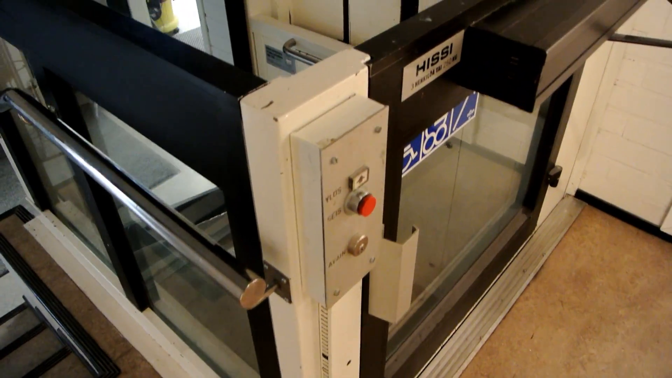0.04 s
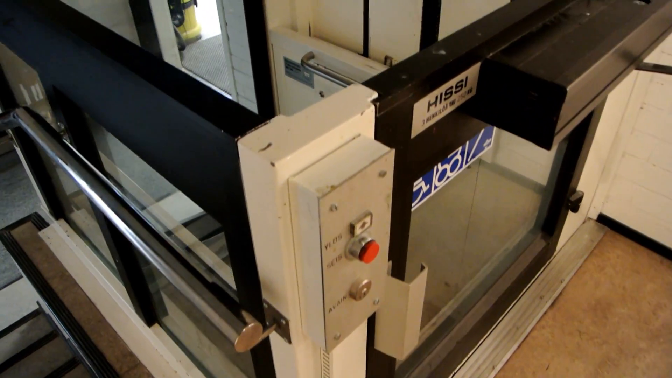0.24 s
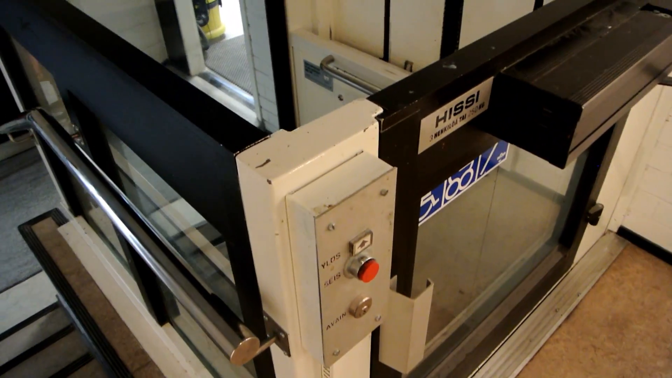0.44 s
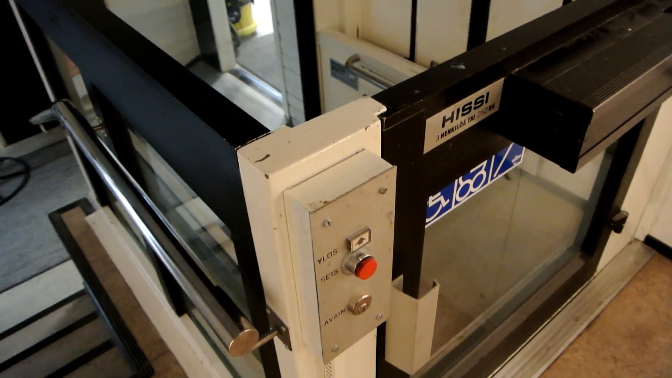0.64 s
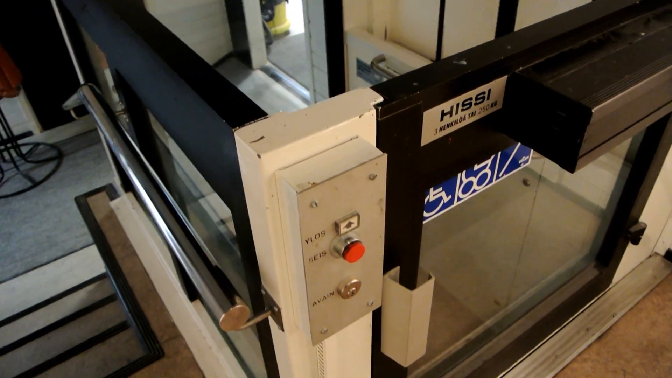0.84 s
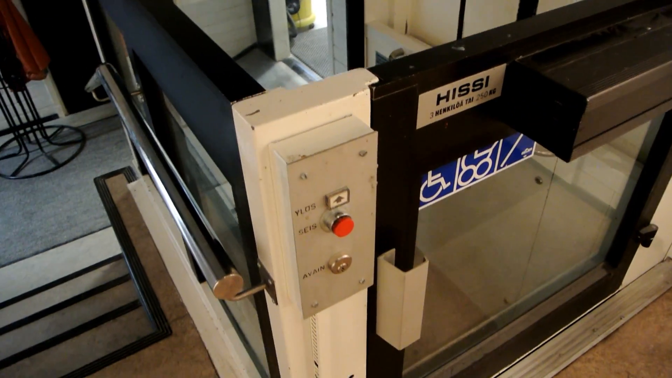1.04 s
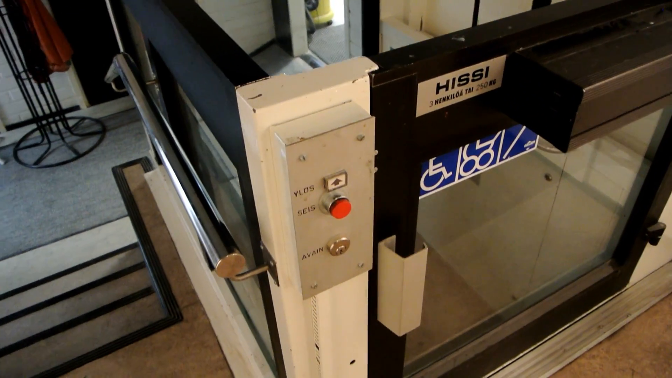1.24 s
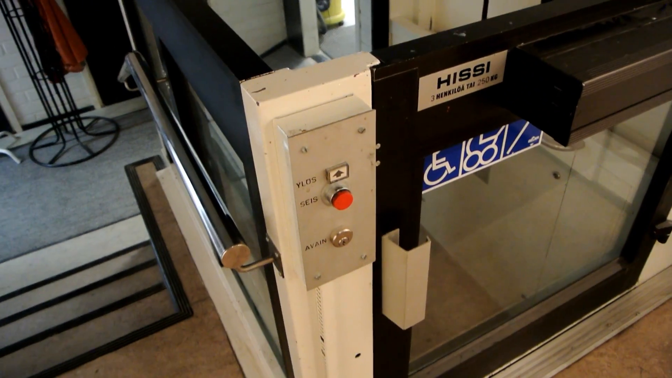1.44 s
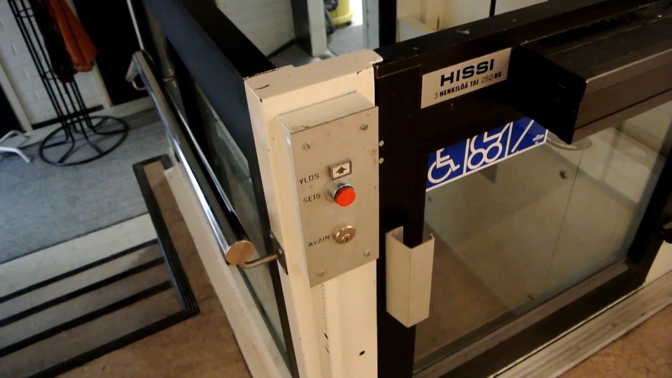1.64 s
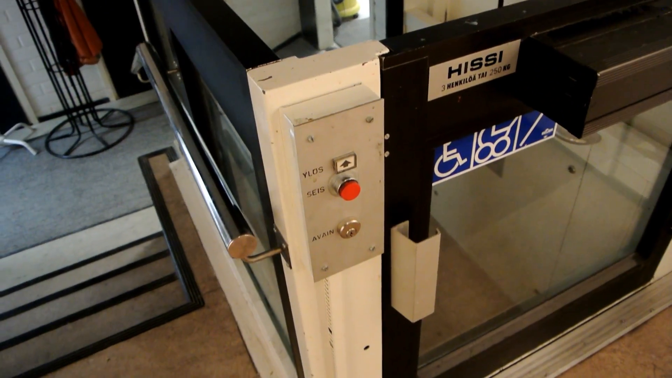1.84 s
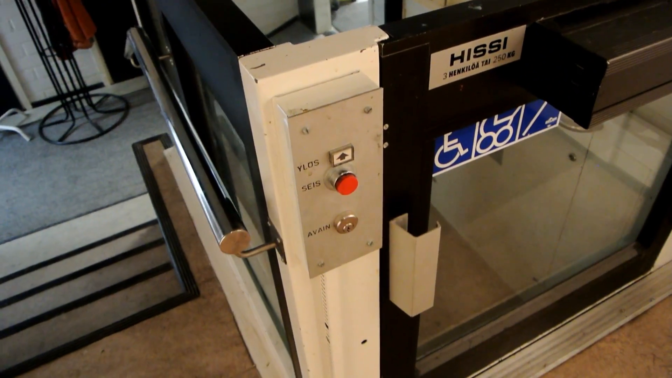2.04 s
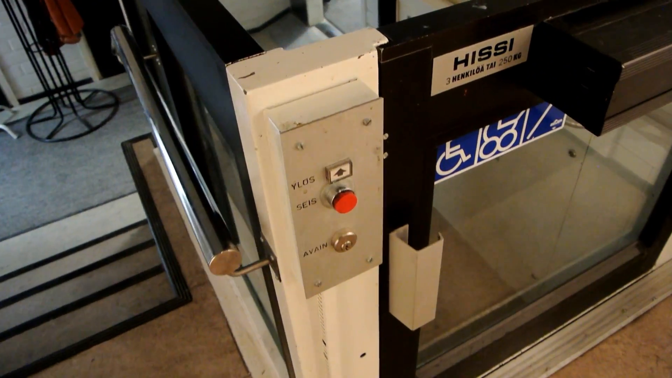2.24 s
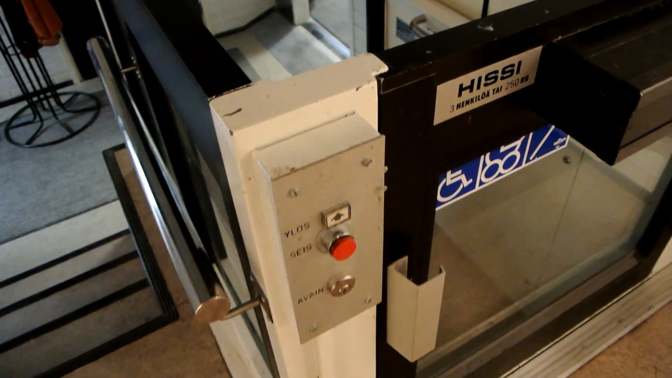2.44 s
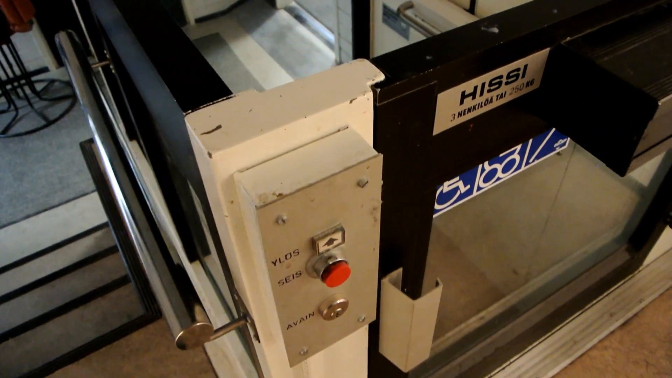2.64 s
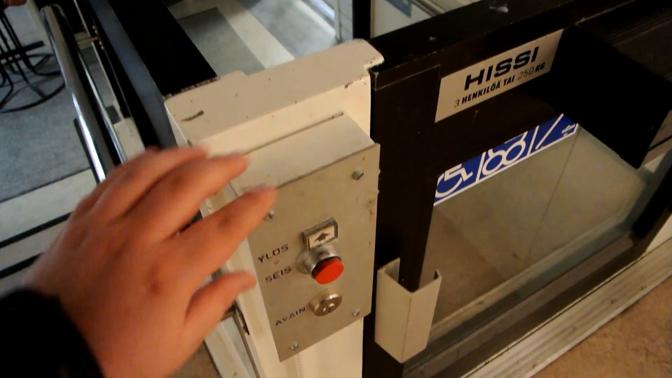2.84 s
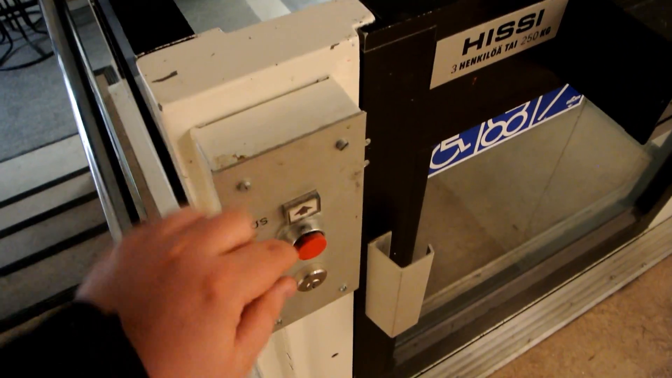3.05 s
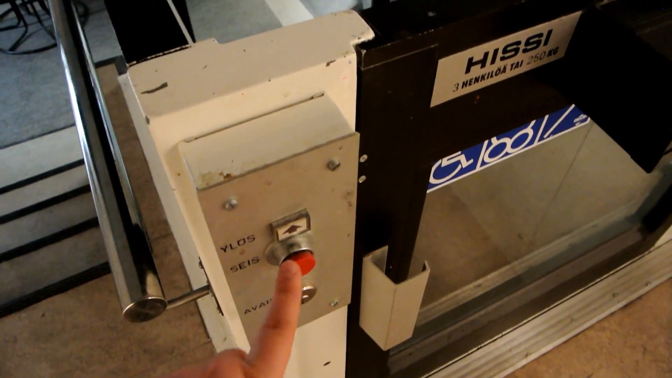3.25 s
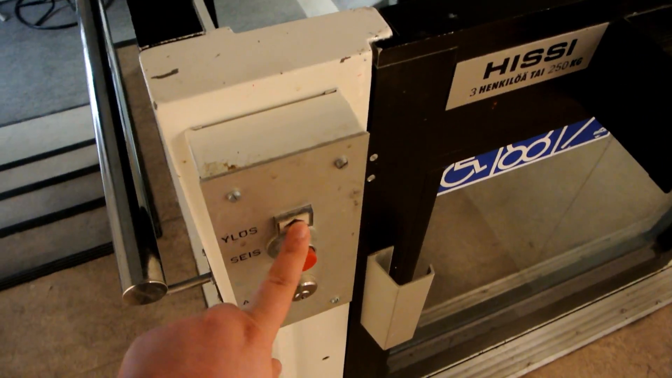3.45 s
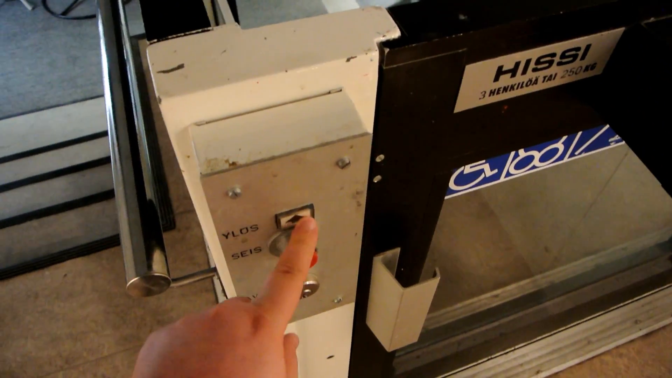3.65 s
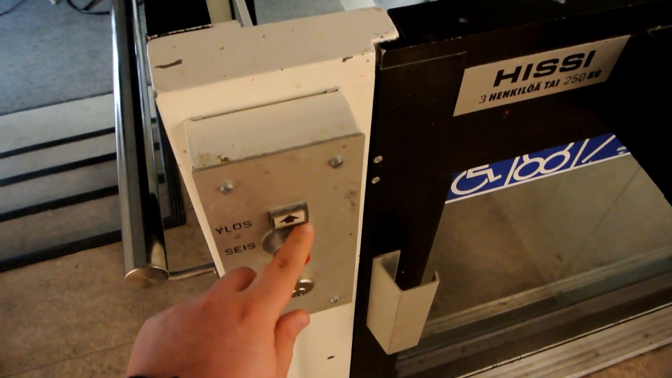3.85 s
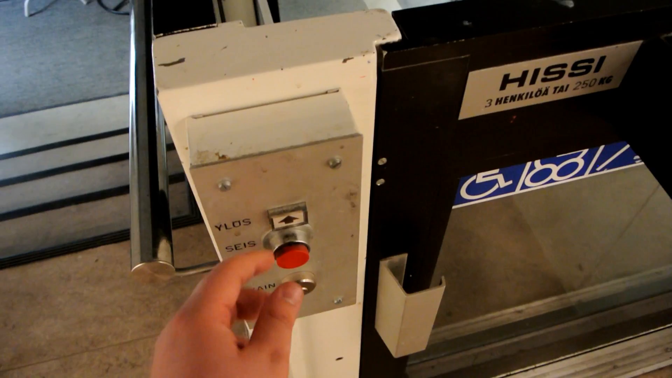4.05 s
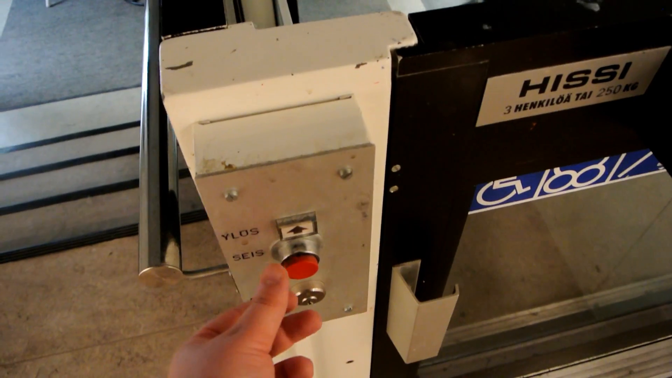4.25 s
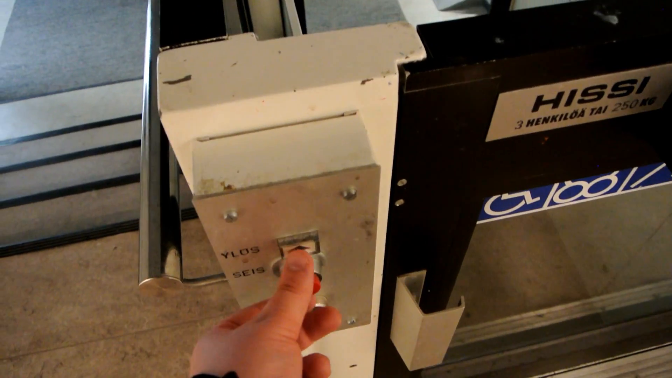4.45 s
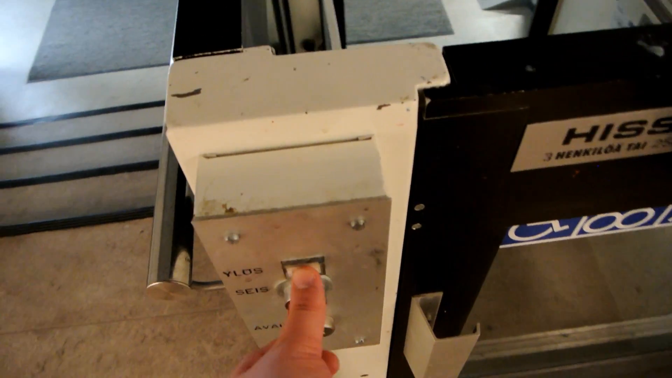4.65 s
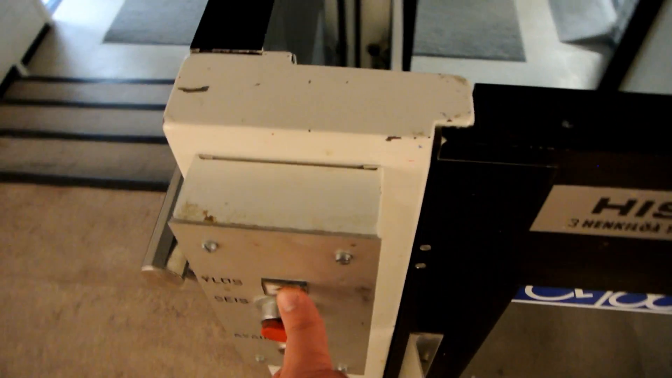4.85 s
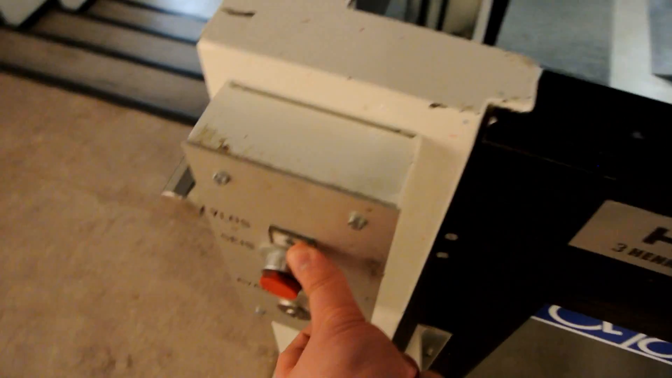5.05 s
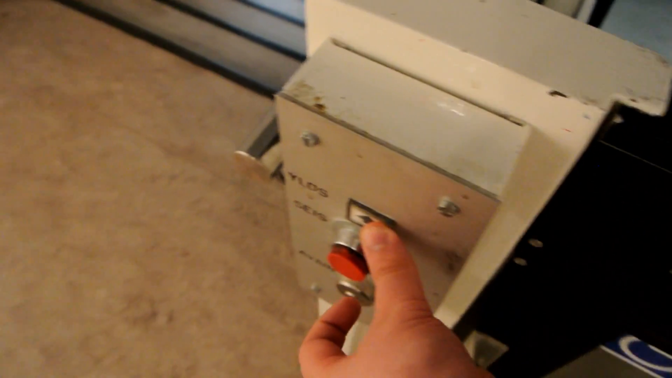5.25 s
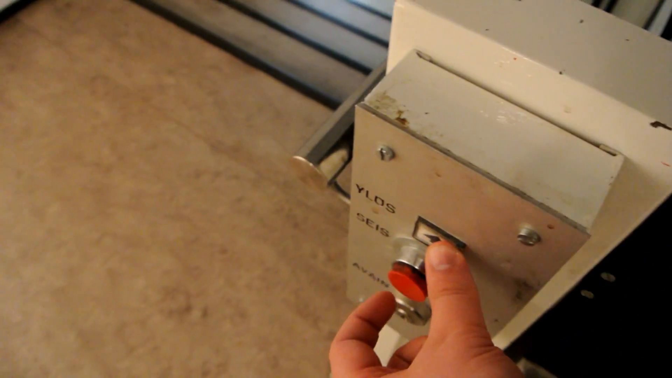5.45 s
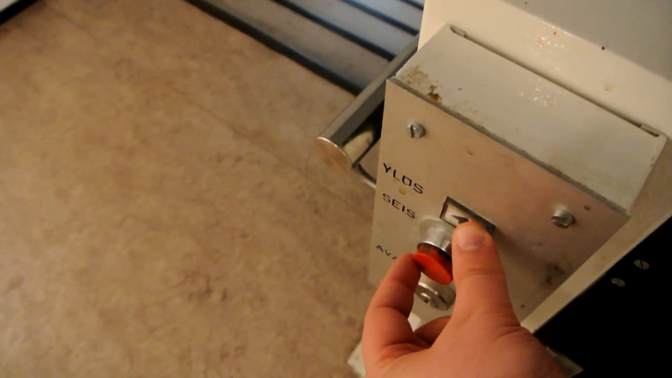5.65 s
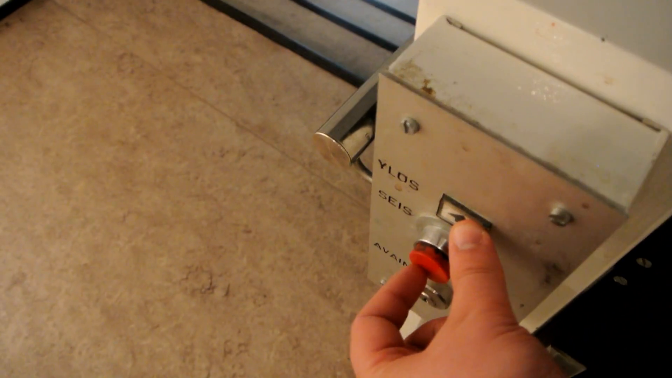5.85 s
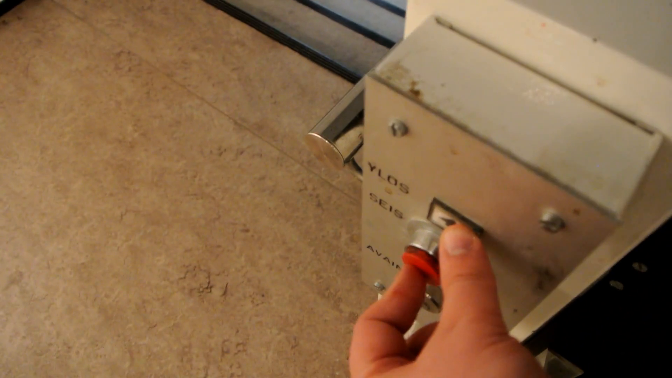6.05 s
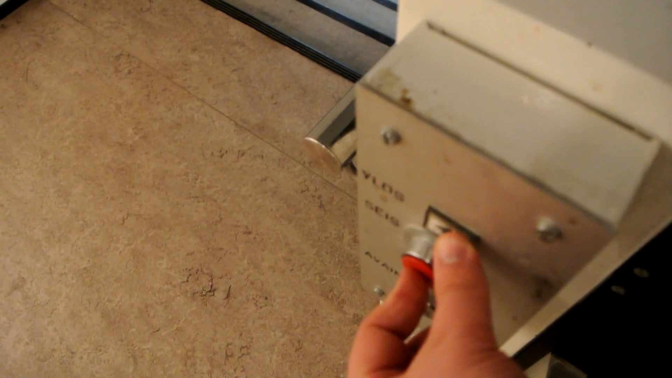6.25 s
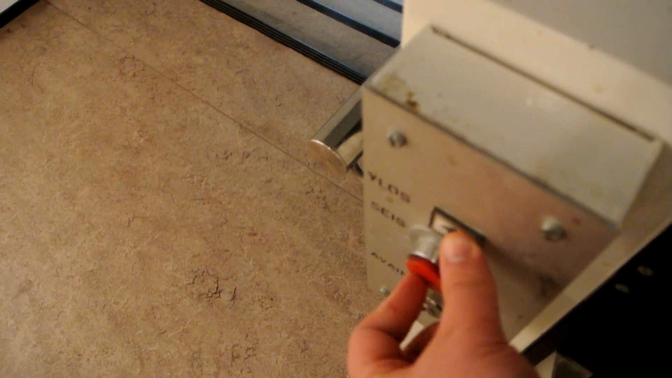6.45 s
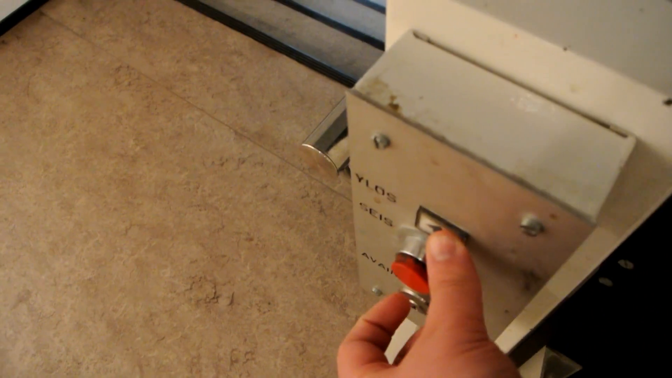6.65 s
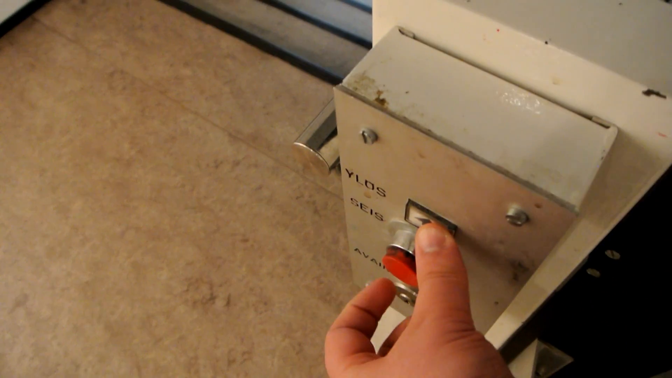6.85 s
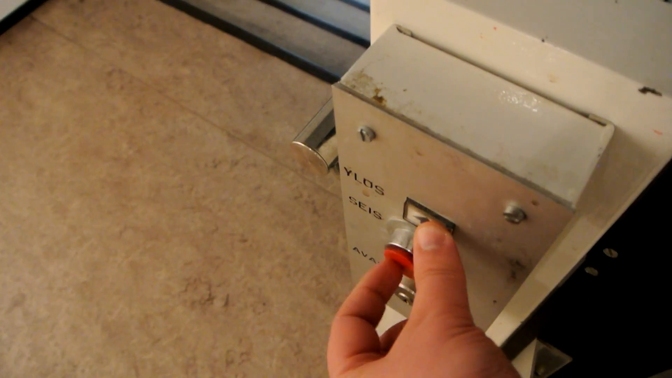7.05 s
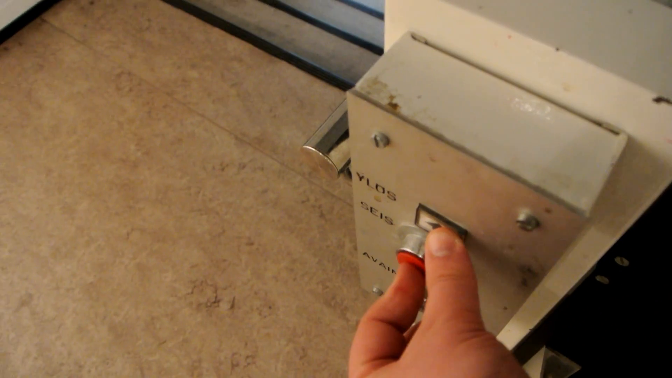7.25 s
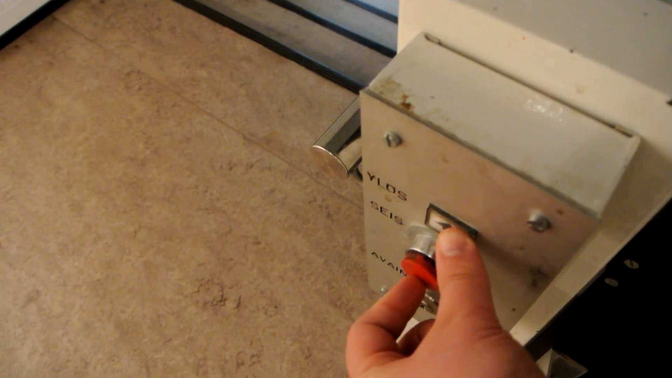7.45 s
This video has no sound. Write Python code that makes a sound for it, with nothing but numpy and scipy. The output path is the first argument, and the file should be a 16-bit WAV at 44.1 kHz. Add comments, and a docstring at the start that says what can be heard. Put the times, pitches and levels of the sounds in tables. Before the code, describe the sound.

A close stereo pickup in a quiet hallway: soft room noise, a faint wandering whine around 1.5 kHz and light sleeve rustles. At 1.2-1.5 s a gate and frame clunk with a bright, rattling knock, and a second, duller heavy clunk follows at 1.9 s. Cloth rustles more around 2.6-3.5 s as an arm reaches in; a faint tick at 3.0 and a crisp button click at 3.53. At 3.7 a relay ticks, the contactor clacks hard and a lock bolt rings; the drive hums with a hissing surge and low shudder, until brake knock and drop-out clack at 4.13. Cloth brushes and a button ticks at 4.67. The lift restarts at 4.85 and runs steadily, hiss fading, until 6.4. A tick at 6.6 leads to a third start at 6.69, another tick at 7.18, and a final brake and clack near 7.38, echoing briefly.

```python
"""Quiet room noise with a faint wandering whine and a sleeve's rustle opens a hallway, close to a small
platform lift. Gate and frame clunk; then the button clicks and the lift is jogged three times: relay,
armature and contactor clack, the lock bolt rings, the drive hums, hisses and shudders, the brake bites
and the contactor drops out. Blows are bursts of tiny contacts ringing a coloured body and a hallway echo;
the drive is wavering sines and shaped noise; cloth and room are coloured noise, the whine a sine."""
import sys
import numpy as np
from scipy import signal
from scipy.fft import rfft, irfft, next_fast_len
from scipy.io import wavfile
from scipy.ndimage import uniform_filter1d, minimum_filter1d, map_coordinates

SR = 44100
rng = np.random.default_rng(int(sys.argv[2]) if len(sys.argv) > 2 else 0)


def file_out(sig):
    """Save sig as 16-bit WAV at sys.argv[1]."""
    # one column per channel
    cols = np.atleast_2d(sig).T
    # limit, then scale
    lim = np.clip(cols, -1, 1)
    pcm = np.round(lim * 32767).astype(np.int16)
    wavfile.write(sys.argv[1], SR, pcm)


N = 331191
TIME = np.arange(N) / SR

# room noise colour: (frequency [Hz], relative level [dB per Hz])
ROOM_COLOUR = [(12, -31), (20, -6), (158, -4.5), (193, -1.5), (472, -5), (678, -5.5), (759, -7.5),
               (1440, -6), (1570, -10), (2140, -10.5), (2460, -10), (3070, -12), (11000, -15), (16000, -20)]
# centre pitch of the whine: (time [s], frequency [Hz])
WHINE_PITCH = [(0, 1461), (2.93, 1490), (3.17, 1440), (3.6, 1474)]

# strokes of the sleeve: (middle [s], length [s], level [dB])
SLEEVE_STROKES = [(0, 0.15, -45.5), (.44, 0.15, -51.5), (0.743, 0.13, -43.5), (2.63, 0.13, -43),
                  (2.86, .28, -43), (3.03, 0.18, -38.5), (3.272, 0.18, -44), (3.473, 0.15, -46),
                  (4.316, 0.15, -37.5), (4.557, 0.33, -44.5)]
# cloth colour: (frequency [Hz], relative level [dB per Hz])
CLOTH_COLOUR = [(200, -0.5), (800, 2.5), (2500, -1.5), (5000, -1), (9000, 0.5), (12500, 1), (16000, -10)]
STROKE_SQUARENESS = 3.6  # higher = more abrupt ends

# knocks on gate and frame: (time [s], level [dB], boom [dB], brightness [dB], rise [s], rattle t60 [s])
FRAME_KNOCKS = [(.40, -43, -10, -17, 0.026, 0.25), (1.11, -42.5, -2, -6, .015, 0.17),
                (1.204, -28, -6, 12.5, 0.00084, 0.7), (1.231, -24, -8, 10.5, 0.0047, 0.83),
                (1.257, -11.5, 9, 13.5, 0.003, 0.2), (1.33, -29.5, 8.5, -19, 0.0071, 1),
                (1.482, -25.5, -5, -1, 0.013, 0.16), (1.814, -24.5, 2, 18.5, 0.01, 0.17),
                (1.893, -10.5, 9.5, 7, 0.025, .21), (2.12, -38, 10.5, -10, 0.058, 0.62),
                (4.52, -36, 6, -5, 0.0061, 0.16)]
# colour of gate and frame: (frequency [Hz], relative level [dB per Hz])
FRAME_COLOUR = [(25, -24), (45, 1.5), (75, -6), (250, -3), (600, -5), (1500, -4.5), (2600, -6), (4500, -12),
                (10000, -12), (13000, -14), (16000, -24.5)]
# resonances of gate and frame: (frequency [Hz], width [Hz], height over the colour [dB])
FRAME_RESONANCES = [(105.8, 0.97, 12.5), (165.2, 4.7, 7.5), (217, 41, 1), (287, 9, 7.5), (436, 24, 2),
                    (1096, 29, 2.5)]

# button and small panel ticks: (time [s], level [dB], body [dB], brightness [dB])
BUTTON_TICKS = [(3.003, -31.5, 2, -18), (3.5294, -13.5, -8.5, -2.5), (3.630, -28, 7, -12),
                (4.671, -25.5, -7, 1), (6.119, -25, -21, 10), (6.606, -25.5, -3, -7), (7.182, -20, -12, 12)]
# button colour: (frequency [Hz], relative level [dB per Hz])
BUTTON_COLOUR = [(60, -32), (300, -15), (550, -2), (1000, -5.5), (1900, -2), (3600, -6.5), (4800, -10),
                 (9000, -23.5), (13000, -14), (16000, -34)]
# button resonances: (frequency [Hz], width [Hz], height over the colour [dB])
BUTTON_RESONANCES = [(550, 390, 3.4), (1660, 140, 1.7), (3840, 100, 1.9)]
TICK_RISE_S, TICK_T60_S = 0.00021, 0.024

# starts of the lift: (contactor closes [s], level [dB], body [dB], relay trigger [dB], armature trigger [dB],
# start-up hiss [dB], delay until the load is taken up [s], jolt of that load [dB])
LIFT_STARTS = [(3.706, -11, -3, -31, -19, -19, .142, -13.5), (4.849, -12.5, 0, -28, -19.5, -21, .176, -23),
               (6.687, -12.5, -4.5, -20.5, -22.5, -25.5, .224, -26)]
# stops of the lift: (contactor drops out [s], level [dB], body [dB], brake knock [dB], its brightness [dB])
LIFT_STOPS = [(4.128, -8.5, -9, -20, 1), (6.402, -10, -5.5, -16.5, -3), (7.377, -11.5, -2, -16.5, -9)]
# relay ticking before each start:
# (delay [s], level over its trigger [dB], body [dB], brightness [dB], rise [s], rattle t60 [s])
RELAY_TICK = [(-.037, -0.5, -6, 7.5, 0.0004, 0.066)]
# armature travelling before contact:
# (delay [s], level over its trigger [dB], body [dB], brightness [dB], rise [s], rattle t60 [s])
ARMATURE_TRAVEL = [(-0.025, 2, -2, 1, 0.0057, 0.12)]
# colour of contactor and lock: (frequency [Hz], relative level [dB per Hz])
CONTACTOR_COLOUR = [(30, -35), (170, -3), (400, -8), (900, -4.5), (1500, -4), (2700, -1.5), (4200, 0),
                    (6500, -7.5), (10000, -7.5), (13000, -12), (16000, -24.5)]
# contactor resonances: (frequency [Hz], width [Hz], height over the colour [dB])
CONTACTOR_RESONANCES = [(640, 120, 13.2), (850, 85, 9.1), (1034, 40, 13.6), (1130, 55, 16.5),
                        (2444, 84, 6.4), (2762, 165, 6.8), (3780, 98, 5.3), (7550, 100, 7.4)]
CLOSE_BRIGHT_DB, CLOSE_RISE_S, CLOSE_T60_S = 6, 0.00084, 0.13
DROP_BRIGHT_DB, DROP_RISE_S, DROP_T60_S = 3.5, 0.0028, 0.089

# the motor's first torque thumping the frame:
# (delay [s], level over the start [dB], boom [dB], brightness [dB], rise [s], rattle t60 [s])
TORQUE_KICK = [(.002, -13.5, 7.5, -3, 0.0043, 0.2)]
# the jolt as the drive takes up the load
TAKE_UP_BOOM_DB, TAKE_UP_BRIGHT_DB, TAKE_UP_RISE_S, TAKE_UP_T60_S = 7.5, 7.5, 0.011, .15
BRAKE_LEAD_S = .143  # the brake bites this long before the drop-out
BRAKE_BOOM_DB, BRAKE_KNOCK_RISE_S, BRAKE_T60_S = 2.5, 0.015, 0.1

# motor and gear tones: (frequency [Hz], level before the overall hum gain [dB])
HUM_TONES = [(96.9, -38), (193.8, -42.5), (301.5, -37), (517.5, -38), (602.9, -43), (737.5, -46),
             (1104, -40), (2509, -52), (2778, -46.5)]
# colour of the platform's rumble: (frequency [Hz], relative level [dB per Hz])
RUMBLE_COLOUR = [(30, -37), (110, -11), (170, 3), (250, -5), (330, 1), (440, 1), (520, -8.5), (800, -5.5),
                 (1150, -2.5), (1600, -8.5), (2200, -19.5), (4000, -19), (9000, -70)]
# colour of the platform's hiss: (frequency [Hz], relative level [dB per Hz])
HISS_COLOUR = [(500, -24), (1500, 6.5), (2700, -3.5), (4000, -1.5), (5200, -1), (7500, -1), (10000, 2),
               (12500, -6), (16000, -35)]
# hiss resonances: (frequency [Hz], width [Hz], height over the colour [dB])
HISS_RESONANCES = [(1940, 140, 5.5), (2560, 250, 10.5), (2740, 70, 6), (6070, 410, -0.5)]
# colour of the low shudder: (frequency [Hz], relative level [dB per Hz])
SHUDDER_COLOUR = [(15, -32), (30, -13), (46, 0), (58, -9.5), (72, -12.5), (160, -29)]
SLOWING_S = 0.079  # the drive slows this long before the drop-out
HUM_DB, SPIN_UP_S, SPIN_DOWN_DB_PER_S = -3.5, 0.24, 115
RUMBLE_DB, RUMBLE_RISE_S, COAST_DB_PER_S = -30.5, 0.18, 46.5
# the hiss falls as a power of the time since the start
HISS_SETTLE_S, HISS_FALL, HISS_STOP_DB_PER_S = 0.059, 0.72, 151
BRAKE_HISS_DB, BRAKE_RISE_S, BRAKE_DB_PER_S = -37.5, 0.063, 92
SHUDDER_DB, JOLT_DB, BRAKE_JOLT_DB = -48.5, -33.5, -41  # steady, added at the start, at braking
SURGE_RISE_S, JOLT_DB_PER_S, SHUDDER_STOP_DB_PER_S = 0.034, 40, 60

# the lock bolt following each start:
# (delay [s], level over the start [dB], body [dB], brightness [dB], rise [s], rattle t60 [s])
BOLT_SHOT = [(.042, -3, -5.5, 3, .002, 0.13)]
# bolt resonances: (frequency [Hz], width [Hz], height over the colour [dB])
BOLT_RESONANCES = [(1922, 140, 15), (2385, 48, 10.4), (2710, 140, 13), (3410, 59, 5.8)]

# likeness of left and right in diffuse sound: (frequency [Hz], correlation)
STEREO_LIKENESS = [(100, 0.8), (300, .94), (600, 0.63), (1200, 0.66), (2500, 0.095), (6000, 0.011)]
# decay of the hallway, before the echo length scales it: (frequency [Hz], t60 [s])
HALL_DECAY = [(100, 1), (260, 0.81), (700, 1), (1840, 0.83), (4850, 0.32), (12800, 0.21)]
# where the lift lies from the listening point: (time [s], left-right difference [dB], left lag [ms])
LIFT_POSITION = [(1.9, 2, -0.017), (3.6, 0, 0.011), (4.2, 1.5, 0.043), (4.9, -0.5, 0.065),
                 (5.6, -4, -0.012), (6.7, -3, 0.11), (7.4, -5, 0.14)]
# the two microphones differ: (frequency [Hz], left-right difference [dB])
MICROPHONE_BALANCE = [(400, 0), (750, -1.5), (8000, -1.5), (15000, 3.5)]
TOP_HZ = 15900
SIDES = np.array([[.5], [-.5]])  # shares a left-right difference between the two channels


def amp(db):
    """Decibels to gain."""
    return 10 ** (np.asarray(db) / 20)


def unit(x):
    """x at rms 1."""
    return x / np.sqrt(np.mean(np.abs(x) ** 2) + 1e-20)


def along(points, hz):
    """(frequency [Hz], value) points read on a log axis."""
    f, v = np.transpose(points)
    return np.interp(np.log(hz + 1), np.log(f + 1), v)


def curves(rows, when=TIME):
    """Each column after the time, read at the given moments."""
    s, *cols = np.transpose(rows)
    return [np.interp(when, s, c) for c in cols]


def wobble(rate):
    """A smooth random curve, rate knots a second."""
    knots = rng.standard_normal(int(N * rate / SR) + 4)
    return map_coordinates(knots, [TIME * rate])


def envelope(start, rise_s, release, fall_db_per_s):
    """A straight rise, a hold until the release, then a steady fall in dB."""
    rise = np.clip((TIME - start) / rise_s, 0, 1)
    return rise * amp(-fall_db_per_s * np.maximum(TIME - release, 0))


def colour(spectrum, modes, hz):
    """Gain of a smooth spectrum with resonances standing on it."""
    peaks = sum(amp(2 * db) / (1 + (2 * (hz - centre) / width) ** 2) for centre, width, db in modes)
    return amp(along(spectrum, hz)) * np.sqrt(1 + peaks)


def causal(gain):
    """The minimum-phase response with this gain: it rings only after the blow."""
    cepstrum = irfft(np.log(np.maximum(gain, 1e-6)))
    half = len(cepstrum) // 2
    return np.exp(rfft(np.r_[cepstrum[0], 2 * cepstrum[1:half], np.zeros(half)]))


def diffuse(spectrum, modes=(), size=N):
    """Coloured stereo noise of rms 1, alike in the bass and unrelated in the treble."""
    m = 2 * next_fast_len(size // 2 + 1)
    hz = np.fft.rfftfreq(m, 1 / SR)
    turn = np.arccos(np.clip(along(STEREO_LIKENESS, hz), -1, 1)) / 2
    noise = rfft(rng.standard_normal((2, m))) * colour(spectrum, modes, hz)
    mid, side = irfft(noise * [np.cos(turn), np.sin(turn)])[:, :size]
    return unit(np.array([mid + side, mid - side]))


def hall_tail(length):
    """A fresh echo, energy 1 on the left; each frequency dies at its own speed."""
    hz, t, z = signal.stft(diffuse([(1, 0)], size=SR), SR, nperseg=256)
    t60 = length * along(HALL_DECAY, hz)[:, None]
    tail = signal.istft(z * amp(-60 * t / t60), SR, nperseg=256)[1]
    tail = tail * (1 - np.exp(-np.arange(tail.shape[1]) / SR / 0.00073))  # soft onset
    return tail / np.linalg.norm(tail[0])


def blows(events, spectrum, modes, body_hz, bright_hz, spiky, wet_db, echo_length=1, size=65536):
    """Each blow is a dying chatter of tiny contacts that rings the struck body and then the hallway."""
    out = np.zeros((2, N + size))
    t, hz = np.arange(size) / SR, np.fft.rfftfreq(size, 1 / SR)
    body = colour(spectrum, modes, hz)
    low = np.exp(-np.log2((hz + 1) / body_hz) ** 2)  # body level acts on the octaves around the boom
    high = hz ** 2 / (hz ** 2 + bright_hz ** 2)  # brightness acts on the treble
    for s, db, body_db, bright_db, rise, t60 in events:
        spikes = np.exp(spiky * rng.standard_normal(size // 16).repeat(16))
        contacts = unit(rng.standard_normal(size) * spikes)
        # the last factor makes up for level lost in a slow rise
        force = contacts * (1 - np.exp(-t / rise)) * amp(-60 * t / t60) * (1 + 2 * rise / t60)
        sound = rfft(force) * causal(unit(body * amp(body_db * low + bright_db * high)))

        pan_db, lag_ms = curves(LIFT_POSITION, s)
        direct = np.exp(-2j * np.pi * hz * SIDES * lag_ms / 1000)
        panels = amp(-2.0) * rfft(hall_tail(0.15), size)  # quick echoes between the lift's glass and steel
        hallway = amp(wet_db) * rfft(hall_tail(echo_length), size)
        pan = amp(SIDES * pan_db * hz / (hz + 700))  # the treble leans to one side more than the bass
        paths = pan * (direct * (1 + panels) + hallway)
        out[:, round(s * SR):][:, :size] += amp(db) * irfft(sound * paths)
    return out[:, :N]


def set_off(parts, triggers):
    """The same sequence of blows for each (time [s], level [dB]) trigger."""
    return [(s + delay, db + part_db, *shape) for s, db in triggers for delay, part_db, *shape in parts]


def starts():
    """(time [s], level [dB]) of each closing of the contactor."""
    return [(s, db) for s, db, *_ in LIFT_STARTS]


def room():
    """Steady room noise, its level gently wavering, with a thin sine whine of wandering pitch."""
    pitch = curves(WHINE_PITCH)[0] + 24 * wobble(110)
    whine = amp(-57.0 + 0.77 * wobble(12)) * np.sin(2 * np.pi * np.cumsum(pitch) / SR)
    noise_gain = amp(-46.0 + 1.65 * wobble(4.05) + 0.33 * wobble(25))
    return noise_gain * diffuse(ROOM_COLOUR) + whine


def sleeve():
    """Cloth slides in short strokes of noise as the arm moves and reaches for the panel."""
    power = sum(amp(db) ** 2 * np.exp(-np.abs(2 * (TIME - s) / length) ** STROKE_SQUARENESS)
                for s, length, db in SLEEVE_STROKES)
    roughness = amp(1.0 * wobble(60))
    return np.sqrt(power) * roughness * diffuse(CLOTH_COLOUR) * amp([[1.3], [-1.3]])  # leans left


def frame():
    """Gate and frame ring and rattle when knocked, at motor torque, load take-up and braking."""
    take_up = [(s + delay, db, TAKE_UP_BOOM_DB, TAKE_UP_BRIGHT_DB, TAKE_UP_RISE_S, TAKE_UP_T60_S)
               for s, *_, delay, db in LIFT_STARTS]
    brake = [(s - BRAKE_LEAD_S, db, BRAKE_BOOM_DB, bright_db, BRAKE_KNOCK_RISE_S, BRAKE_T60_S)
             for s, *_, db, bright_db in LIFT_STOPS]
    events = FRAME_KNOCKS + set_off(TORQUE_KICK, starts()) + take_up + brake
    return blows(events, FRAME_COLOUR, FRAME_RESONANCES, body_hz=245, bright_hz=4320, spiky=0.34, wet_db=-4.0)


def button():
    """Push button and panel click: fast-rising, fast-dying contacts ring a small body, with less hallway."""
    events = [(*tick, TICK_RISE_S, TICK_T60_S) for tick in BUTTON_TICKS]
    return blows(events, BUTTON_COLOUR, BUTTON_RESONANCES,
                 body_hz=660, bright_hz=4950, spiky=0.67, wet_db=-7.5, echo_length=1.0)


def contactor():
    """At each start a relay ticks, the armature travels and the contactor clacks in; at each stop it drops out."""
    events = [(s, db, body_db, DROP_BRIGHT_DB, DROP_RISE_S, DROP_T60_S) for s, db, body_db, *_ in LIFT_STOPS]
    for s, db, body_db, relay_db, armature_db, *_ in LIFT_STARTS:
        events += set_off(RELAY_TICK, [(s, relay_db)])
        events += set_off(ARMATURE_TRAVEL, [(s, armature_db)])
        events += [(s, db, body_db, CLOSE_BRIGHT_DB, CLOSE_RISE_S, CLOSE_T60_S)]
    return blows(events, CONTACTOR_COLOUR, CONTACTOR_RESONANCES,
                 body_hz=890, bright_hz=5350, spiky=0.47, wet_db=-3.0, echo_length=0.91)


def motion():
    """Gains of hum, rumble, hiss and shudder: each run starts, settles, brakes and coasts to rest."""
    hum = rumble = hiss = shudder = 0
    for (start, _, _, _, _, hiss_db, *_), (stop, *_) in zip(LIFT_STARTS, LIFT_STOPS):
        age = np.maximum(TIME - start, 0)
        brake, slowing = stop - BRAKE_LEAD_S, stop - SLOWING_S
        hum = hum + amp(HUM_DB) * envelope(start, SPIN_UP_S, slowing, SPIN_DOWN_DB_PER_S)
        rumble = rumble + amp(RUMBLE_DB) * envelope(start, RUMBLE_RISE_S, slowing, COAST_DB_PER_S)

        surge = amp(hiss_db) * (1 + age / HISS_SETTLE_S) ** -HISS_FALL
        hiss = hiss + surge * envelope(start, SURGE_RISE_S, slowing, HISS_STOP_DB_PER_S)
        hiss = hiss + amp(BRAKE_HISS_DB) * envelope(brake, BRAKE_RISE_S, brake, BRAKE_DB_PER_S)

        shaking = amp(SHUDDER_DB) + amp(JOLT_DB - JOLT_DB_PER_S * age)
        running = shaking * envelope(start, SURGE_RISE_S, slowing, SHUDDER_STOP_DB_PER_S)
        braking = amp(BRAKE_JOLT_DB) * envelope(brake, SURGE_RISE_S, slowing, SHUDDER_STOP_DB_PER_S)
        shudder = shudder + np.maximum(running, braking)
    return hum, rumble, hiss, shudder


def drive():
    """Wavering motor and gear sines over noise for the moving platform's rumble, hiss and shudder."""
    hum_gain, rumble_gain, hiss_gain, shudder_gain = motion()
    drift = np.cumsum(0.002955 * wobble(6)) / SR  # all tones share one waver of speed, as the load varies
    tones = 0
    for hz, db in HUM_TONES:
        phase = 2 * np.pi * (hz * (TIME + drift) + rng.random()) + 0.6 * wobble(24)
        tones = tones + amp(db + 5.25 * wobble(8)) * np.sin(phase)
    rumble = rumble_gain * amp(wobble(30)) * diffuse(RUMBLE_COLOUR)
    flutter = amp(1.33 * wobble(90) + 0.28 * wobble(21))
    hiss = hiss_gain * flutter * diffuse(HISS_COLOUR, HISS_RESONANCES)
    shudder = shudder_gain * diffuse(SHUDDER_COLOUR)
    pan = curves(LIFT_POSITION)[0] * SIDES  # only the hiss is shaded from the far microphone
    return hum_gain * tones + rumble + shudder + amp(pan) * hiss


def lock():
    """Just after the contactor, the lock bolt shoots home with a ring of its own."""
    return blows(set_off(BOLT_SHOT, starts()), CONTACTOR_COLOUR, BOLT_RESONANCES,
                 body_hz=770, bright_hz=5500, spiky=0.067, wet_db=-2)


def scene():
    """Everything that reaches the two microphones."""
    return room() + sleeve() + frame() + button() + contactor() + drive() + lock()


def record(dry):
    """Duck the loudest peaks, tilt the two microphones apart and cut everything above the band limit."""
    needed = np.minimum(1, amp(-3.5) / (np.abs(dry).max(axis=0) + 1e-9))
    gain = uniform_filter1d(minimum_filter1d(needed, size=221), size=221)  # about 5 ms windows
    m = next_fast_len(N + SR // 2)
    hz = np.fft.rfftfreq(m, 1 / SR)
    balance = amp(along(MICROPHONE_BALANCE, hz) * SIDES)
    return irfft(rfft(dry * gain, m) * balance * (hz < TOP_HZ), m)[:, :N]


dry = scene()
out = record(dry)
file_out(out)
```